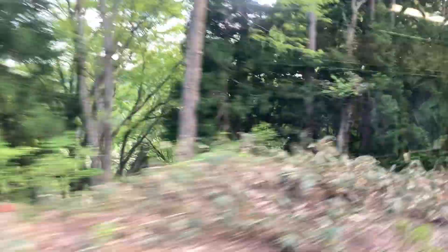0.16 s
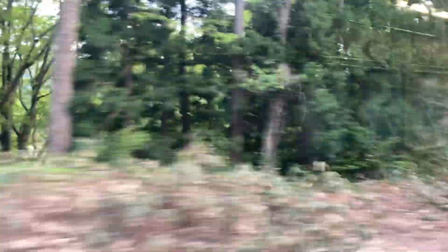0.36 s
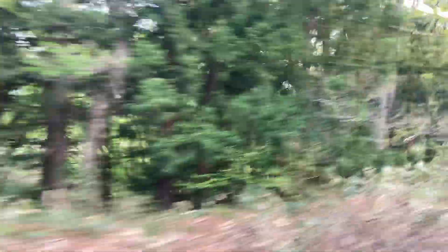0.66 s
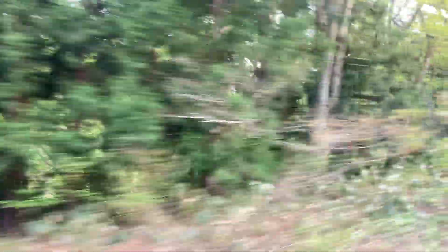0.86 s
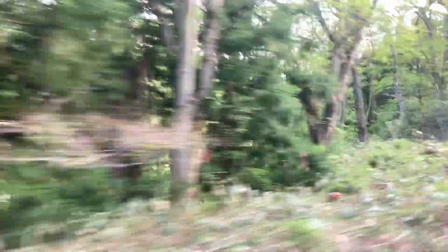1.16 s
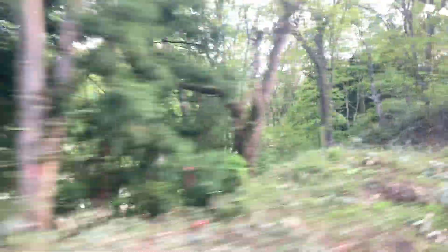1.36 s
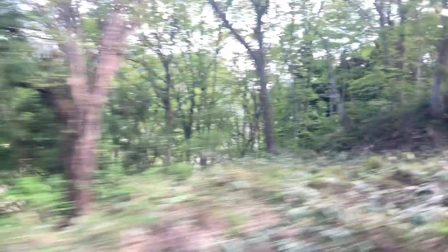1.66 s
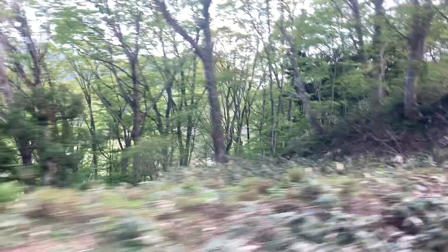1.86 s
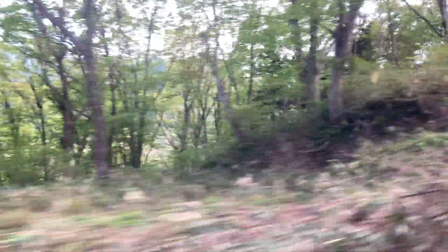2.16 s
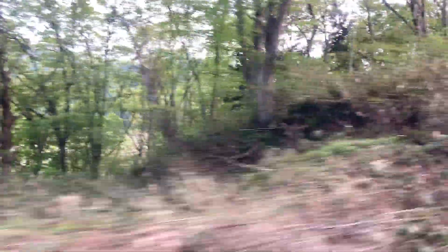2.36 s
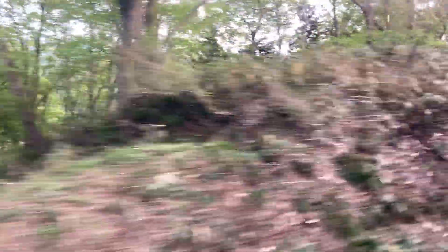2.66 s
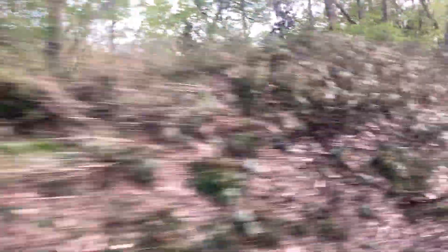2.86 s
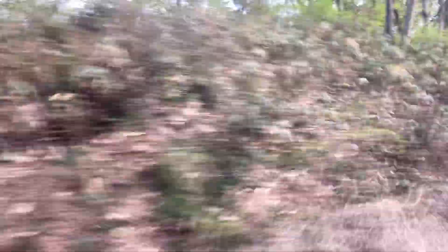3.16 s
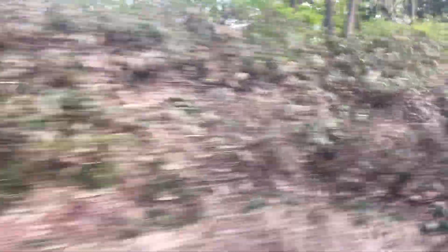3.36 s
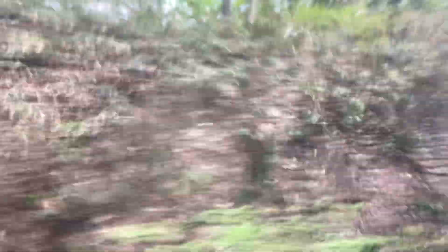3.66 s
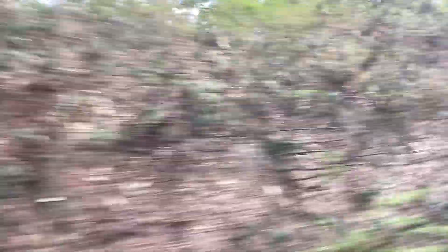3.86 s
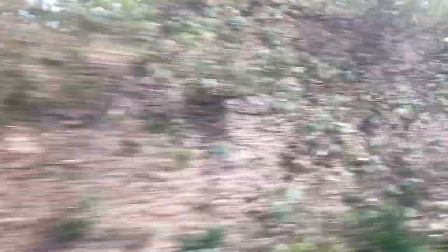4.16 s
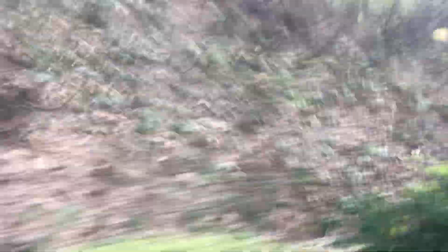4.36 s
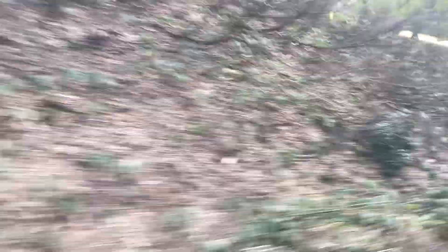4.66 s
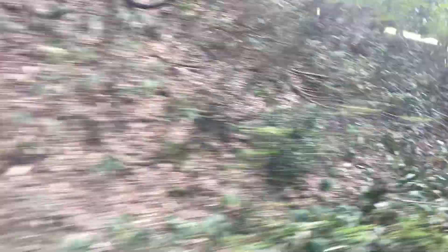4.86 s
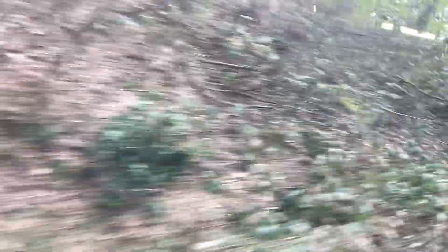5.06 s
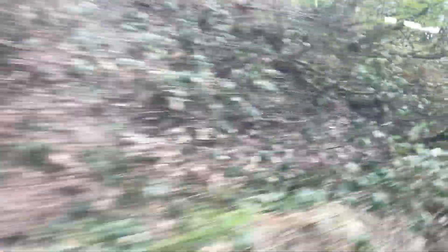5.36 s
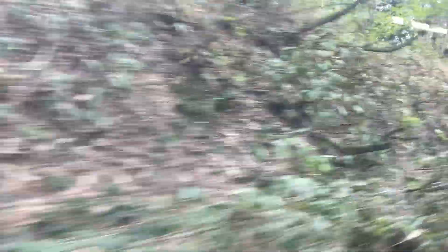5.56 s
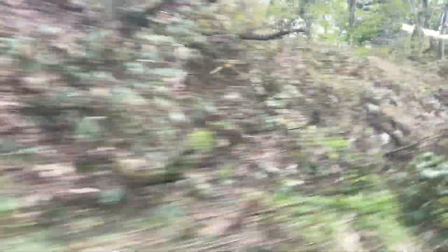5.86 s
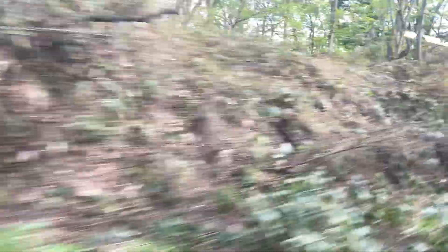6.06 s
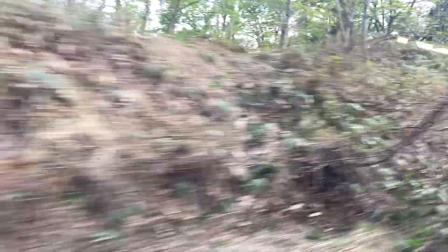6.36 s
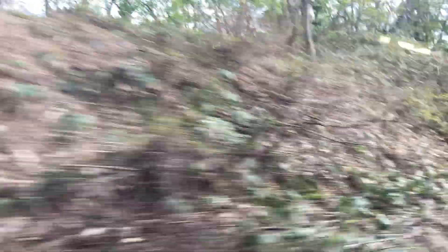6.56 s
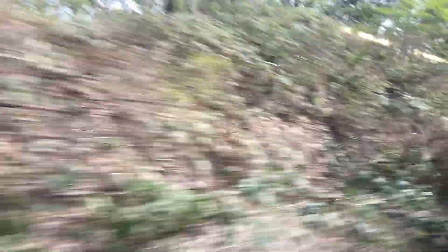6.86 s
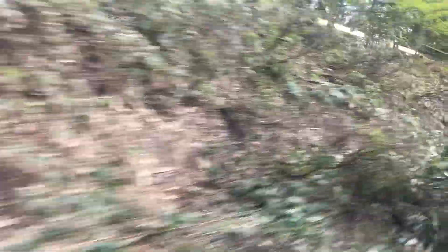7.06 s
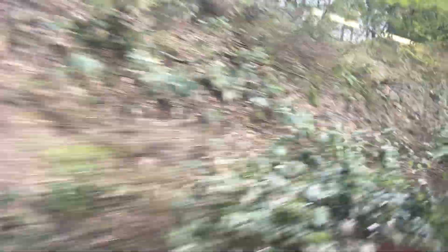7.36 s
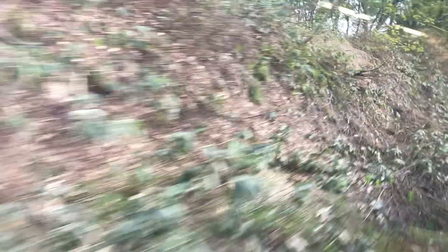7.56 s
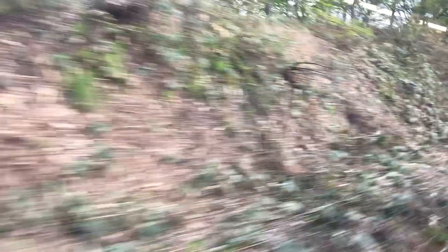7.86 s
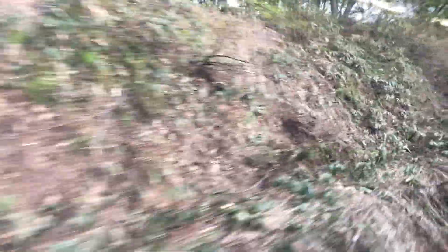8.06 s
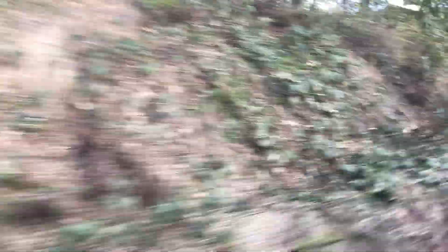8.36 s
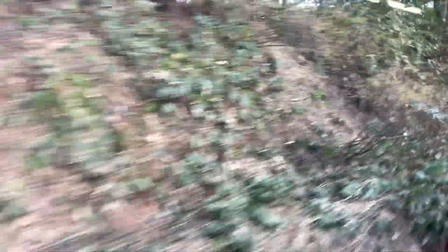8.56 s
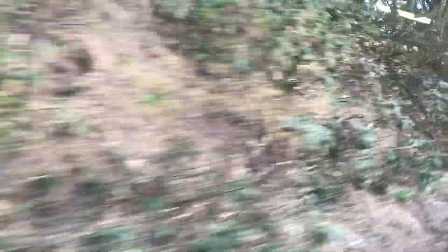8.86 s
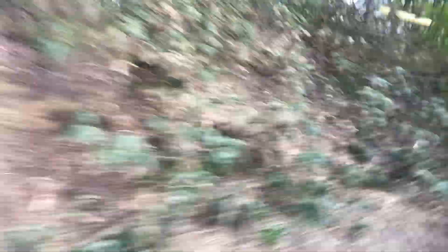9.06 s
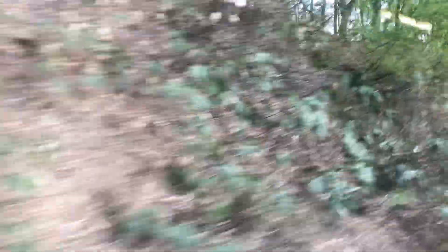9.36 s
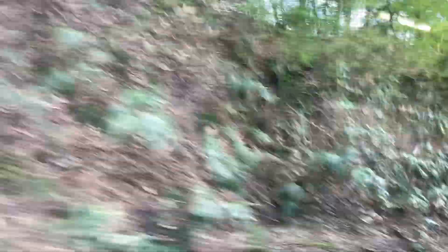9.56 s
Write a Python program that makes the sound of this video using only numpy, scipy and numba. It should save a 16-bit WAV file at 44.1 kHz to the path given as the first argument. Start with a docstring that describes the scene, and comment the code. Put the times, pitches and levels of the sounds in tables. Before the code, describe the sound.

Inside a moving electric train: steady rumbling wheel roar and low hum, rhythmic rail-joint clatter, and several hard knocks on the window pane.

```python
"""Inside a railway carriage: noise-band wheel roar throughout, over a wavering drive hum and gear whine.
From 0.2 s, about every 1.3 s, a rail joint booms and clatters in a group of four decaying noise bursts.
At 3.1-3.7 s a handheld recorder knocks on the window pane (dispersed pulses, thumps, chatter), and a limiter
ducks the hard blows. Sine squeaks follow at 4.4-5.8 s, a knock at 6.1 s and one at 9.3 s with a late low thump.
Single wheel blows, rattles, narrow-band flange scrapes and briefly ringing panels are scattered throughout."""
import sys
import numpy as np
from scipy import signal
from scipy.fft import rfft, irfft, next_fast_len
from scipy.io import wavfile
from scipy.ndimage import uniform_filter1d, minimum_filter1d, map_coordinates
from numba import njit

SR = 44100
rng = np.random.default_rng(int(sys.argv[2]) if len(sys.argv) > 2 else 0)


def volts(x):
    """Linear amplitude factor 10**(x/20) for a level x in dB, scalar or array-like."""
    e = np.asarray(x, float) / 20
    return 10 ** e


def log_audio(samples):
    """Write samples as a 16-bit WAV file to the path given in sys.argv[1]."""
    # one column per channel
    frames = np.atleast_2d(samples).T
    # limit to full scale, then quantise
    limited = np.clip(frames, -1, 1)
    pcm = np.round(limited * 32767).astype(np.int16)
    wavfile.write(sys.argv[1], SR, pcm)


N = 428211

# rail joints: (first axle strikes [s], clatter level [dB], boom above clatter [dB], shudder [dB])
RAIL_JOINTS = [(0.2402, -29.5, 16, 5), (1.525, -29, 17, 0), (2.828, -30, 17.5, -2),
               (4.132, -33.5, 19.5, 0.5), (5.4585, -31, 20.5, 5.5), (6.787, -33.5, 20.5, -1),
               (8.112, -28.5, 16, -2), (9.418, -22.5, 14.5, -1)]
# track condition: (time [s], rail roughness [dB], floor shake [dB])
TRACK_CONDITION = [(0, 2, 1), (.2, 0, 4), (.46, 2.5, 7), (.56, 2.5, 6), (.7, -0.5, 4), (.9, 2, 0),
                   (1.34, 1.5, 3), (1.86, 3, 2.5), (2.1, 0, 4.5), (2.45, -1, -3), (2.84, 0.5, 3),
                   (3.5, 2.5, 3), (4.05, -2.5, -0.5), (4.77, -3, -6.5), (5, -5, -5.5), (5.4, -2.5, -3),
                   (6.05, 0.5, 6), (6.45, -0.5, 1), (6.76, -3.5, -3), (7.1, -2.5, 1.5), (7.95, -4.5, -5),
                   (8.3, 1, 2.5), (8.5, 1.2, -2.5), (8.7, 2.5, 0), (9.05, 1.5, -2.5), (9.36, 3, 5.5),
                   (9.71, 6, 9)]


def unit(x):
    """x scaled to rms 1."""
    return x / np.sqrt(np.mean(x ** 2) + 1e-20)


def along(points, hz):
    """Interpolates (frequency [Hz], value) points on a log frequency axis."""
    f, v = np.transpose(points)
    return np.interp(np.log(hz + 1), np.log(f + 1), v)


def curves(rows):
    """One value per sample for each column after the time."""
    s, *cols = np.transpose(rows)
    return [np.interp(np.arange(N) / SR, s, c) for c in cols]


def wobble(rate_hz):
    """Smooth random curve with rate_hz knots a second."""
    knots = rng.standard_normal(int(N * rate_hz / SR) + 4)
    return map_coordinates(knots, [np.arange(N) * rate_hz / SR])


def filtered(x, response):
    """x filtered by a complex response of frequency."""
    m = next_fast_len(N + 8192)
    return irfft(rfft(x, m) * response(np.fft.rfftfreq(m, 1 / SR)), m)[..., :N]


def rush(spectrum, patchy_db):
    """Stereo noise of rms 1; panels ring up in patches, left and right as alike as the carriage makes them."""
    # (frequency [Hz], left-right correlation)
    likeness = [(60, 0.91), (340, 0.92), (700, 0.81), (1030, 0.84), (1550, 0.45), (2300, 0.2),
                (4300, 0.035), (6000, .35), (7000, 0.79), (9000, 0.59), (12000, 0.59)]
    z = signal.stft(rng.standard_normal((2, N)), nperseg=1024)[2]
    field = uniform_filter1d(rng.standard_normal(z.shape[1:]), size=3, axis=0)
    field = uniform_filter1d(field, size=8, axis=1)
    pair = signal.istft(z * volts(patchy_db * unit(field)), nperseg=1024)[1][:, :N]

    def mid_side(hz):
        angle = np.arccos(np.clip(along(likeness, hz), -1, 1)) / 2
        return volts(along(spectrum, hz)) * [np.cos(angle), np.sin(angle)]

    mid, side = filtered(pair, mid_side)
    return unit(np.array([mid + side, mid - side]))


def bursts(times_s, levels_db, rise_s, t60_s):
    """Envelope of blows that swell quickly and die in the car body; powers add."""
    power, t = np.zeros(N + SR), np.arange(SR // 2) / SR
    shape = (1 - np.exp(-t / rise_s)) * volts(-60 * t / t60_s)
    for s, db in zip(times_s, levels_db):
        power[round(s * SR):][:len(t)] += (volts(db) * shape) ** 2
    return np.sqrt(power[:N])


def tone(hz, db, drift_rad, rate_hz, waver_db):
    """Sine with drifting phase and wavering level."""
    phase = 2 * np.pi * np.cumsum(hz + np.zeros(N)) / SR + drift_rad * wobble(rate_hz)
    return np.sqrt(2) * volts(db + waver_db * wobble(5)) * np.sin(phase)


def shudder():
    """Body swell in dB, greatest between the two bogies crossing each joint."""
    after_s, width_s = 0.18, 0.18
    t = np.arange(N) / SR
    return sum(db * np.exp(-((t - s - after_s) / width_s) ** 2) for s, _, _, db in RAIL_JOINTS)


def running():
    """Rough wheels on rough rail: floor rumble, body roar, growl and rail hiss share part of their unevenness."""
    # noise spectra: (frequency [Hz], relative level [dB])
    rumble_spectrum = [(20, -49), (36, -42), (46, -34), (54, -5.5), (110, -5), (170, -7.5), (260, -54),
                       (400, -88)]
    roar_spectrum = [(100, -41), (170, 0.5), (260, 3), (380, -3), (520, -1), (620, -7.5), (900, -59.5)]
    growl_spectrum = [(450, -21.5), (620, -3), (750, -1), (950, -8.5), (1250, -14.5), (2000, -84)]
    hiss_spectrum = [(600, -18), (1300, 2.5), (2200, -1.5), (3200, -9), (4500, -16.5), (5700, -23.5),
                     (7300, -26.5), (11000, -31), (12800, -50), (15000, -65), (16500, -82)]
    (rough_db, shake_db), swell_db = curves(TRACK_CONDITION), shudder()
    track = wobble(9)

    rumble_db = -24 + shake_db + 0.66 * swell_db + 0.71 * track + 1.5 * wobble(5)
    roar_db = -20.5 + 0.99 * rough_db + swell_db + 1.45 * track + 1.22 * wobble(25)
    growl_db = -30.5 + 1.2 * rough_db + swell_db + 0.67 * track + 2.1 * wobble(30)
    hiss_db = -36 + 0.73 * rough_db + 0.5 * swell_db + 1.5 * track + 0.87 * wobble(30)

    rumble = volts(rumble_db) * rush(rumble_spectrum, patchy_db=2.0)
    roar = volts(roar_db) * rush(roar_spectrum, patchy_db=1.5)
    growl = volts(growl_db) * rush(growl_spectrum, patchy_db=2.0)
    hiss = volts(hiss_db) * rush(hiss_spectrum, patchy_db=2.0)
    return rumble + roar + growl + hiss


def joints():
    """Each wheel blow booms unsteadily through the floor and clatters in the frame; loose fittings rattle."""
    # two bogies of two axles: (delay after first axle [s], clatter change [dB], boom change [dB])
    axles = [(0, -0.5, 1), (0.113, 1.3, 2), (.335, -1, 2), (.45, -4.5, -2)]
    # further single wheel blows, some close to the joints:
    # (time [s], clatter level [dB], boom above clatter [dB])
    single_blows = [(.082, -39.5, 23), (0.445, -28.5, 17.5), (1.001, -42, 17), (1.506, -34, 15.5),
                    (2.719, -41.5, 22), (3.162, -38, 10), (8.925, -38.5, 22.5), (1.5894, -25.5, 17),
                    (2.3276, -38, 12), (2.92, -26.5, 14.5), (2.9994, -34, 19), (3.4794, -33.5, 11),
                    (4.3528, -35.5, 17.5), (4.464, -38, 20), (4.81, -33.5, -5), (5.16, -36, -5),
                    (5.63, -28.5, 12), (5.79, -32, 21), (7.25, -42, 8), (6.0691, -37, 20), (9.6286, -39, 7)]
    # loose fittings: (time [s], level [dB])
    rattles = [(0.446, -53), (0.765, -46), (1.8148, -44), (2.9, -46), (4.35, -46.5), (4.81, -42.5),
               (5.82, -51), (6.6494, -52), (8.11, -55), (9.42, -51)]
    # noise spectra: (frequency [Hz], relative level [dB])
    boom_spectrum = [(60, -25), (150, -10.5), (280, 1), (400, -4.5), (540, 0), (750, -13), (1100, -17.5),
                     (2000, -63.5)]
    clatter_spectrum = [(700, -4), (1400, 4), (2300, 3.5), (3200, -3.5), (4500, -9.5), (5700, -16),
                        (7300, -16.5), (11000, -23.5), (12800, -41), (15500, -56), (16500, -68)]
    rattle_spectrum = [(2000, -31), (4000, -7), (7300, -6), (11000, -6), (13000, -17), (15500, -29),
                       (16500, -42)]

    wheels = [(s + late_s, db + axle_db, boom_db + more_db)
              for s, db, boom_db, _ in RAIL_JOINTS for late_s, axle_db, more_db in axles]
    wheels = [w for w in wheels if w[0] < N / SR]
    s, db, boom_db = np.transpose(wheels + single_blows)
    boom = bursts(s, db + boom_db, rise_s=0.0092, t60_s=0.36) * volts(1.47 * wobble(60))
    boom = boom * rush(boom_spectrum, patchy_db=2.5)
    clatter = bursts(s, db, rise_s=0.0073, t60_s=0.46) * volts(1.45 * wobble(70))
    clatter = clatter * rush(clatter_spectrum, patchy_db=2.0)
    s, db = np.transpose(rattles)
    rattle = bursts(s, db, rise_s=0.004, t60_s=0.3) * rush(rattle_spectrum, patchy_db=2.5)
    return boom + clatter + rattle


def chirp(t, low_hz, fall_hz, fall_s, peak_s, order):
    """Wave packet peaking near peak_s while its pitch falls by fall_hz towards low_hz."""
    turns = low_hz * t + fall_hz * fall_s * (1 - np.exp(-t / fall_s))
    return (t / peak_s * np.exp(1 - t / peak_s)) ** order * np.cos(2 * np.pi * turns)


def pane_wave(hard_db):
    """One blow at both ports: the pane's causal colour, its bending waves spreading out, high ones first."""
    # colour of a blow: (frequency [Hz], relative level [dB])
    pane_colour = [(40, 14), (110, 29), (200, 30), (300, 32.5), (400, 39), (510, 42.5), (600, 36),
                   (700, 30), (790, 16), (900, 29), (1030, 30), (1150, 24), (1300, 12), (1750, 7),
                   (2400, 5.5), (2900, -0.5), (3250, -13), (3550, -13), (4200, -16.5), (5000, -25),
                   (6300, -21.5), (11000, -28), (16000, -43)]
    # (frequency [Hz], left over right [dB])
    pane_left_db = [(900, 0), (1150, -4), (1500, 10.5), (2000, 7.5), (2800, 12), (3250, 5), (4200, 12),
                    (5000, 8), (6300, 6), (8000, -7)]
    spread_s = 0.00099  # lateness of a 1 kHz bending wave; goes with 1 / root of frequency
    frame_s, frame_hz = 0.00699, 295  # the heavy frame's extra lateness at 0 Hz, and where it has halved

    hz = np.fft.rfftfreq(4096, 1 / SR)
    left_db = along(pane_left_db, hz)
    level_db = along(pane_colour, hz) + along([(600, 0), (1500, hard_db)], hz)
    level_db = level_db + np.outer([0.5, -0.5], left_db)
    # folding the cepstrum gives minimum phase
    cepstrum = irfft(np.log(volts(level_db)))
    cepstrum[:, 1:2048] *= 2
    cepstrum[:, 2049:] = 0
    turns = 2 * spread_s * np.sqrt(1000 * hz) + frame_s * frame_hz * np.arctan(hz / frame_hz)
    wave = irfft(np.exp(rfft(cepstrum) - 2j * np.pi * turns))
    return wave[:, :SR // 20] / np.abs(wave).max()


def knocks():
    """Each knock is a spreading wave in the glass, a low thump and a brief chatter of small renewed contacts."""
    # recorder on pane: (time [s], blow [dB], hardness [dB], thump re blow [dB], chatter re blow [dB, offset])
    pane_knocks = [(3.0681, 2, 4, -19, -31), (3.2275, 11, 1, -9.5, -38), (3.2519, 2, 0, -30, -6.5),
                   (3.3591, 9, 2, -21, -16), (3.3679, -6, -10, -31, -4), (3.5685, 13, 0, -16, -26),
                   (3.582, 4, 3, -30, -7), (3.7015, 16.5, 5.5, -26, -22), (3.7126, 6.5, 1, -30, -6),
                   (6.1428, 7.5, 1, -9, -30), (9.285, -5, -4.5, -20, -12), (9.2951, -19.5, -1, 17, -11)]
    out, t = np.zeros((2, N + SR)), np.arange(SR // 20) / SR
    for s, db, hard_db, thump_db, chatter_db in pane_knocks:
        contacts = rng.standard_normal(len(t)) * (1 - np.exp(-t / 0.0026)) * np.exp(-(t / 0.012) ** 3)
        chatter = signal.fftconvolve(pane_wave(hard_db + 1), contacts[None], axes=1)[:, :len(t)]
        thump = chirp(t, low_hz=50, fall_hz=155, fall_s=0.0081, peak_s=0.0073, order=3)
        blow = pane_wave(hard_db) + volts(chatter_db - 19.5) * chatter + volts(thump_db) * thump
        out[:, round(s * SR):][:, :len(t)] += volts(db) * blow
    return out[:, :N]


def scrapes():
    """Wheel flange on rail: narrow noise bands that start sharply and die fast."""
    # (time [s], frequency [Hz], level [dB], t60 [s])
    flange_scrapes = [(.446, 1990, -36, .15), (1.988, 2500, -38, .15), (2.338, 2250, -37, .1),
                      (5.845, 4530, -37, 0.27), (6.79, 2370, -27, .2), (7.121, 2260, -29.5, 0.25),
                      (7.25, 2260, -27.5, .15), (8.57, 2200, -39, .25), (8.71, 2360, -30.5, 0.31),
                      (9.168, 2710, -28.5, 0.13), (9.249, 2930, -25, 0.11)]
    out, t = np.zeros((2, N + SR)), np.arange(SR // 4) / SR
    for s, hz, db, t60_s in flange_scrapes:
        grain = uniform_filter1d(rng.standard_normal((2, len(t))), size=50)
        grain = unit(uniform_filter1d(grain, size=50))
        envelope = volts(db - 60 * t / t60_s) * (1 - np.exp(-t / 0.0022))
        out[:, round(s * SR):][:, :len(t)] += envelope * grain * np.sin(2 * np.pi * hz * t)
    return out[:, :N]


def squeaks():
    """Brief wheel squeals, equal left and right, breaking up as the wheel grips and slips."""
    # (time [s], length [s], frequency [Hz], level [dB])
    wheel_squeaks = [(4.54, .075, 2255, -40), (4.63, .05, 2235, -42), (4.38, .14, 3150, -54),
                     (4.8, .1, 4010, -50.5), (4.92, .25, 3145, -53), (5.45, .3, 3135, -55),
                     (4.85, .05, 1990, -49), (4.91, .11, 1985, -42.5), (5.045, .05, 1975, -41.5)]
    t = np.arange(N) / SR
    grip, stray_rad = volts(2 * wobble(35)), 0.5 * wobble(40)
    out = np.zeros(N)
    for s, length_s, hz, db in wheel_squeaks:
        envelope = np.sin(np.pi * np.clip((t - s) / length_s, 0, 1)) ** 0.6
        out += volts(db) * envelope * np.sin(2 * np.pi * hz * t + stray_rad)
    return grip * out


def panels():
    """Floor and wall panels left ringing by a blow: each swells quickly and rings unsteadily at its own pitch."""
    # (time [s], frequency [Hz], level [dB], t60 [s])
    ringing_panels = [(.42, 245, -11, .4), (.44, 800, -19, .25), (4.16, 285, -16, .3), (4.265, 315, -9, .3),
                      (4.465, 520, -16, .2), (4.51, 380, -14, .2), (5.77, 720, -18, .5),
                      (8.54, 570, -18, .4), (8.6, 540, -17, .6), (8.93, 570, -18, .6), (9.44, 270, -12, .8),
                      (9.62, 285, -12, .4)]
    return sum(bursts([s], [db], rise_s=0.008, t60_s=t60_s)
               * tone(hz, 0, drift_rad=0.75, rate_hz=40, waver_db=1) for s, hz, db, t60_s in ringing_panels)


def drive():
    """Unsteady hum orders that swell with floor shake and shudder, a gliding gear whine and thin tones."""
    # drive hum: (frequency [Hz], level [dB])
    hum_orders = [(53.8, -29.5), (107.7, -30.5), (160, -34), (211, -29.5), (267, -31.5)]
    # gears: (time [s], frequency [Hz], level [dB])
    gear_whine = [(0, 738, -38), (3, 736, -40), (4.5, 740, -44), (6.4, 735, -42), (8, 740, -40),
                  (8.5, 742, -42), (9.15, 744, -33), (9.71, 745, -37)]
    # thin tones: (frequency [Hz], level [dB])
    thin_tones = [(794, -43), (3145, -61)]
    swell = volts(0.5 * (curves(TRACK_CONDITION)[1] + shudder()))
    hum = sum(tone(hz, db, drift_rad=1.1, rate_hz=20, waver_db=2) for hz, db in hum_orders)
    whine = tone(*curves(gear_whine), drift_rad=1.3, rate_hz=28, waver_db=4)
    thin = sum(tone(hz, db, drift_rad=0.8, rate_hz=30, waver_db=4) for hz, db in thin_tones)
    return swell * hum + whine + thin


def ports(x, airborne):
    """The left port, further from the sound, hears late; airborne sound also has its own balance and phase."""
    # (frequency [Hz], left minus right [dB])
    balance_db = [(60, -1), (200, -0.4), (500, 2.5), (800, 0.4), (1550, 5.5), (2800, 4), (4300, 1.5),
                  (5200, 0)]
    # (frequency [Hz], phase lead of left besides its lag [rad])
    lead_rad = [(40, 0.26), (350, 0.4), (700, 0.89), (900, 0.78), (1300, 0.34), (5000, -0.46),
                (6500, -0.61), (8300, -0.83), (10500, 0.53), (12000, 1.5)]
    lag_s = 12 / 44100

    def both(hz):
        # each port takes half the difference
        colour = along(balance_db, hz) * np.log(10) / 40 + 0.5j * along(lead_rad, hz)
        half = airborne * colour - 1j * np.pi * hz * lag_s
        return np.exp([half, -half])

    return filtered(x, both)


def scene():
    """The carriage and the knocks at the two microphone ports."""
    carriage = running() + joints() + scrapes() + panels() + drive()
    return ports(carriage, airborne=True) + ports(knocks(), airborne=False) + squeaks()


@njit
def recover(needed, hold, step):
    """Gain falls at once, waits hold samples, then creeps back towards 1."""
    gain, g, wait = np.empty_like(needed), 1.0, 0.0
    for i in range(len(needed)):
        if needed[i] <= g:
            g, wait = needed[i], hold
        elif wait > 0:
            wait -= 1
        else:
            g = min(g + (1 - g) * step, needed[i])
        gain[i] = g
    return gain


def band_limit(x):
    """A steep low-pass at the top of the band."""
    return signal.sosfilt(signal.butter(12, 15750, fs=SR, output="sos"), x)


def record(dry):
    """Peak limiter with short look-ahead, 0.11 s hold and 0.16 s release."""
    needed = np.minimum(1, 0.92 / (np.abs(dry).max(axis=0) + 1e-9))
    gain = recover(minimum_filter1d(needed, size=41), 0.11 * SR, 1 / (0.16 * SR))
    limited = dry * uniform_filter1d(gain, size=21)
    return band_limit(limited)


dry = scene()
out = record(dry)
log_audio(out)
```